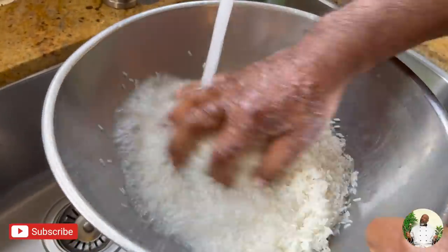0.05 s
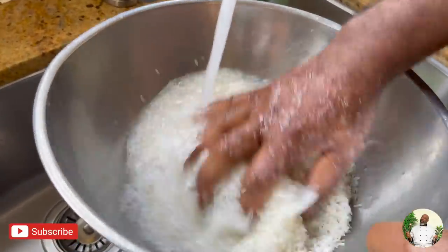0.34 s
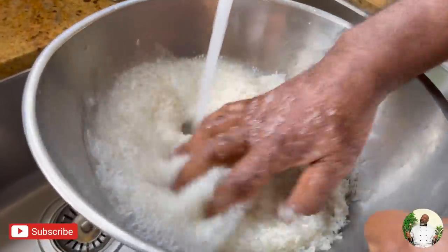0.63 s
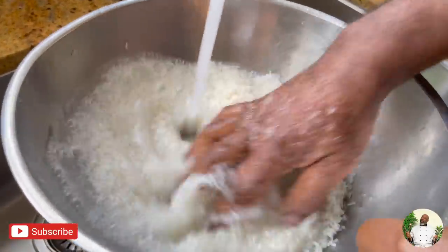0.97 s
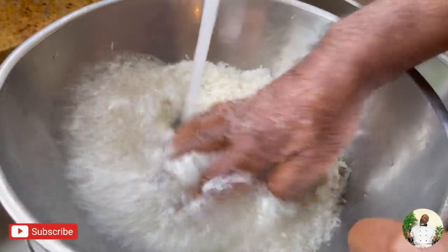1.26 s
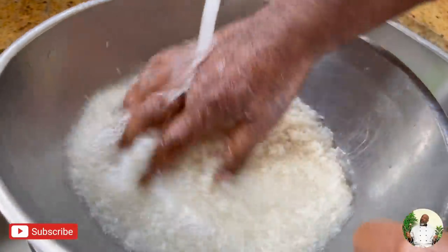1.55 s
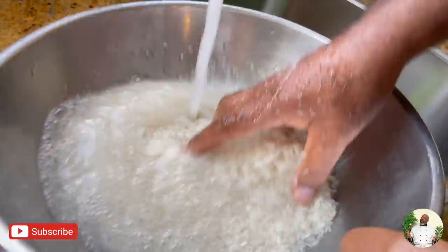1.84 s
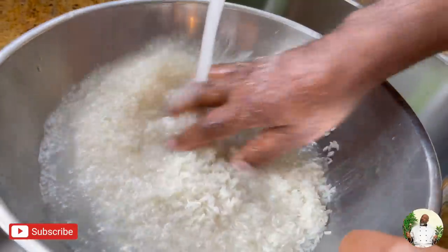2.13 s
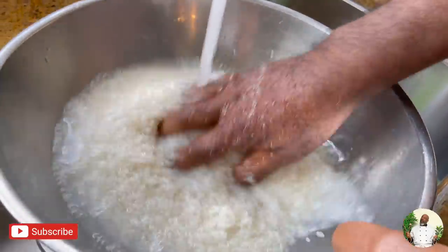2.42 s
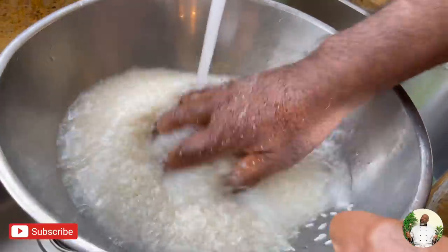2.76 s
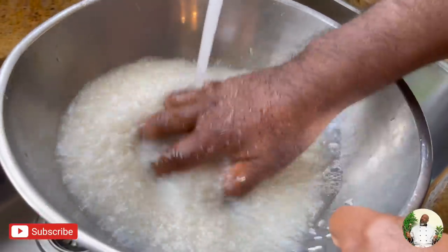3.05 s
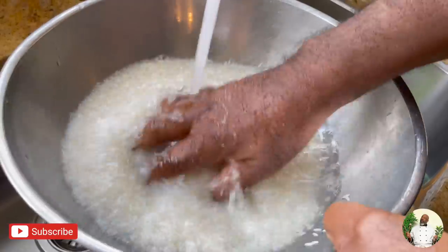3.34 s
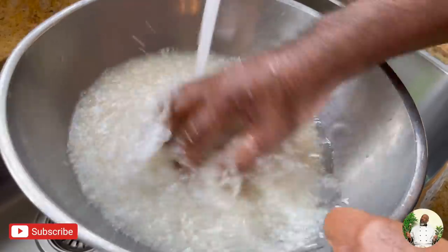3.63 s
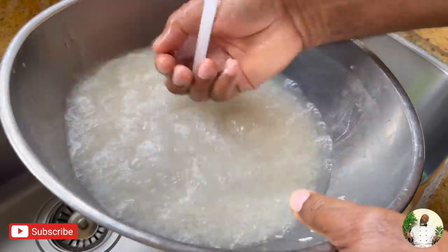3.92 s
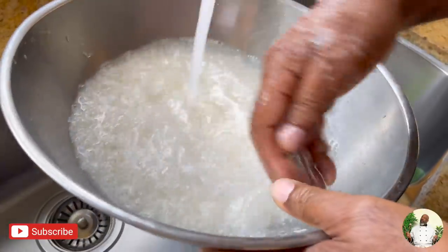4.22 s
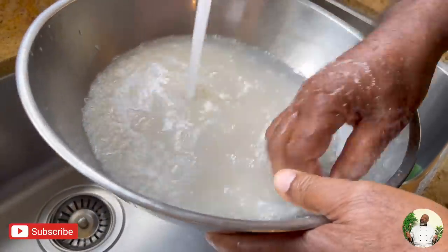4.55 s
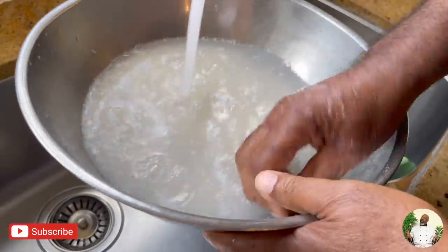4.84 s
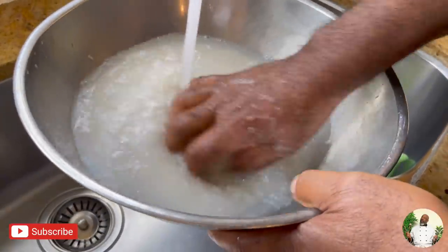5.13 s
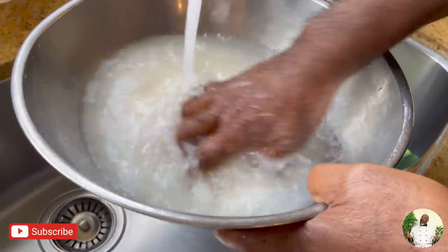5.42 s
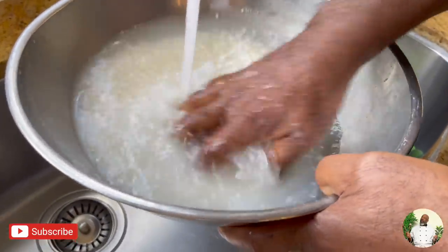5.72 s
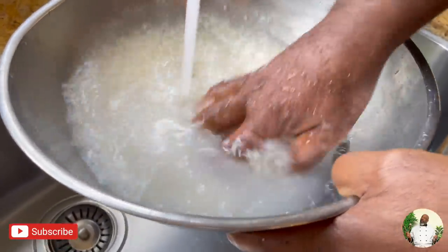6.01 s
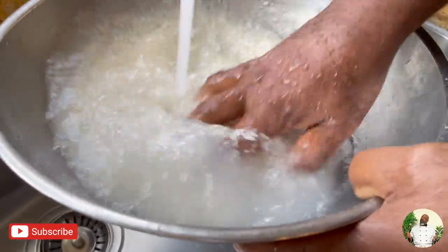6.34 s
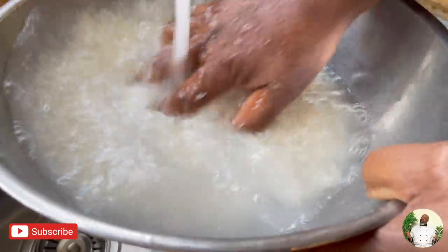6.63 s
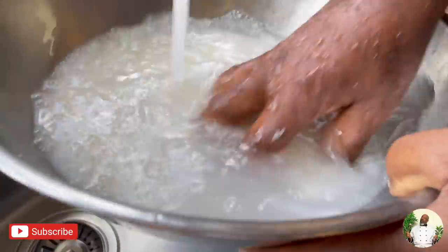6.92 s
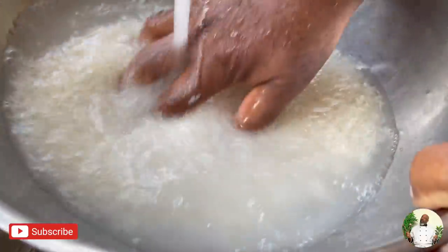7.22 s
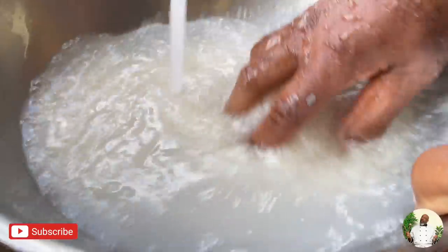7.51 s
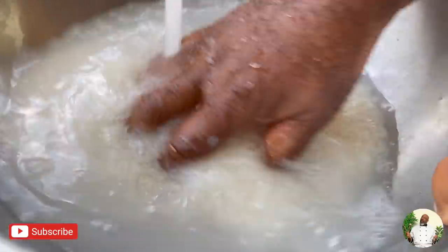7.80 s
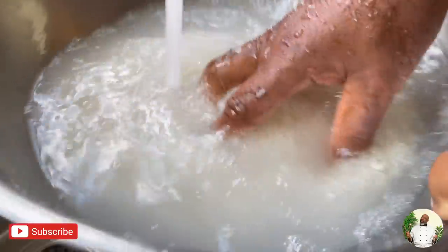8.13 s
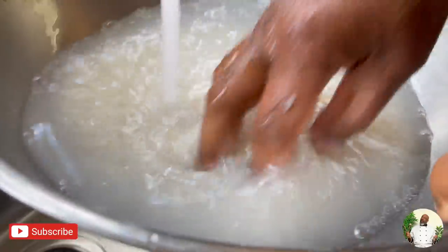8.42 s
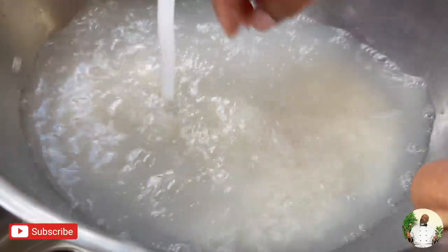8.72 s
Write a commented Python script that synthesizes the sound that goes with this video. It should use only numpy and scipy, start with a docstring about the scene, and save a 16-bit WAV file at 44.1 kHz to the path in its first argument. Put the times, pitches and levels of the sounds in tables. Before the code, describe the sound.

A tap runs into a steel bowl while a hand swishes rice in the water, with sloshes, plops and wet rustling.

```python
"""A fizzing tap jet and the wet rustle of rice, stirred and squeezed by hand in a steel bowl.
Aerator bubbles burst where the jet lands; grains tick and the steel rings with each stroke.
Air folded into the water plops, gulps and sloshes; water slaps and squirts between the fingers.
Midway, and briefly later, the hand cups the jet and the bowl quietens. Now and then the bowl rocks.
Kitchen walls reflect the water sounds; a motor hums underneath."""
import sys
import numpy as np
from scipy import signal
from scipy.fft import rfft, irfft
from scipy.io import wavfile
from scipy.ndimage import uniform_filter1d

SR = 44100
rng = np.random.default_rng(int(sys.argv[2]) if len(sys.argv) > 2 else 0)


def output_pcm(signal):
    """Save a mono or channel-first signal as 16-bit PCM at the path in sys.argv[1].

    Samples are clipped to [-1, 1] before scaling.
    """
    pcm = np.clip(np.atleast_2d(signal).T, -1, 1) * 32767
    wavfile.write(sys.argv[1], SR, np.round(pcm).astype(np.int16))


N = 386316
TIME_S, FREQ_HZ = np.arange(N) / SR, np.fft.rfftfreq(N, 1 / SR)

# Table levels are ahead of each source's trim.
# spectral shapes (frequency [Hz], gain [dB])
ROOM_SPECTRUM = [(20, -24), (32, -15), (45, -8), (60, 2), (80, -5), (120, -4), (230, -14.5), (430, -27.5),
                 (1000, -20), (4000, -19), (16000, -54)]
SHALLOW_SPECTRUM = [(30, -45), (60, -20), (95, -10), (130, 0.5), (160, 2), (190, 3), (235, -4), (290, 5),
                    (355, 2), (450, -8), (1200, -45)]
DEEP_SPECTRUM = [(30, -45), (60, -18), (95, -5), (125, -0.5), (178, 4), (228, -2), (265, 2), (320, -7.5),
                 (360, -5.5), (450, -15), (1200, -45)]
SPLASH_SPECTRUM = [(100, -36), (250, 7.5), (350, -5), (420, 1.5), (510, -2), (600, 3.5), (660, 0.5),
                   (720, 0.5), (810, -0.5), (900, 3), (990, -1.5), (1200, -0.5), (1450, 1), (1900, 1.5),
                   (4500, -17)]
RICE_SPECTRUM = [(400, -40), (900, -8), (1600, -10), (2100, -4.5), (2650, 2), (2950, 2), (3300, 1.5),
                 (3900, -1), (5000, -0.5), (8000, -45)]
FOAM_SPECTRUM = [(1500, -46), (2800, -28), (3700, -8), (4500, -3), (5050, -1), (5600, -1), (6500, -2.5),
                 (7500, -7.5), (10000, -27)]
JET_SPECTRUM = [(1500, -59), (4000, -27), (6000, -11), (7000, -8), (8000, -2), (9500, 2), (10600, 1.6),
                (11500, -1.5), (12300, -11), (13200, -14), (14100, -26), (16000, -39)]

# motor partials (frequency [Hz], level [dB])
MOTOR_PARTIALS = [(59.2, -57), (177.6, -65)]
# bowl rocks on its support (time [s], length [s], pitch [Hz], level [dB])
BOWL_NUDGES = [(1.627, 0.04, 130, -33.5), (1.646, 0.08, 57.8, -35), (3.19, 0.059, 109, -41),
               (4.827, 0.11, 49, -35)]
# bowl modes (frequency [Hz], width [Hz], level [dB], response to rubbing [dB/dB])
STEEL_MODES = [(276.6, 45, -55.5, .1), (679, 60, -62.5, .2), (860, 65, -57, 0.7), (2190, 280, -53, 0.79),
               (2974, 320, -51.5, 1.3), (5030, 570, -48.5, 0.98)]
# water swept round the bowl (time [s], length [s], resonance [Hz], level [dB])
WATER_SURGES = [(2.347, 0.14, 1010, -42), (2.768, 0.18, 875, -43), (2.857, .1, 430, -45),
                (3.01, 0.13, 1050, -42), (3.22, 0.27, 950, -47.5), (3.536, 0.12, 790, -42.5),
                (6.89, 0.14, 636, -43), (7.036, .09, 275, -41), (7.457, 0.13, 576, -41.5),
                (8.324, 0.4, 258, -44.5)]
# foam between hand and steel (time [s], length [s], resonance [Hz], level [dB])
FOAM_SIZZLES = [(0.062, 0.037, 4840, -32), (0.428, 0.034, 5070, -36), (.7, .06, 5100, -38),
                (.97, 0.13, 4970, -40), (2.735, 0.055, 5450, -39), (4.19, 0.047, 5050, -36),
                (5.292, 0.11, 5200, -41), (5.454, 0.069, 5040, -36), (5.752, 0.052, 5050, -40),
                (7.055, 0.04, 5030, -42), (7.62, 0.16, 4870, -35), (8.135, 0.073, 5000, -38)]
# fingers crunch through rice (time [s], length [s], level [dB])
RICE_SCRAPES = [(0.342, 0.13, -38), (0.947, 0.13, -36), (1.334, 0.045, -36), (2.197, 0.061, -36.5),
                (2.345, 0.11, -40), (2.538, 0.042, -31), (2.847, 0.053, -36), (5.758, 0.098, -39),
                (7.056, .08, -40)]
# water through fingers or palm (time [s], length [s], resonance [Hz], width [Hz], level [dB])
HAND_SQUIRTS = [(0.607, 0.066, 2050, 900, -36.5), (0.942, 0.032, 2500, 1100, -35),
                (1.268, 0.1, 2320, 800, -41), (1.92, 0.11, 2900, 550, -38), (1.982, 0.12, 1060, 550, -39.5),
                (2.055, 0.11, 1270, 600, -43.5), (3.224, 0.021, 1880, 2800, -35),
                (3.734, 0.024, 2300, 1200, -32.5), (3.839, 0.043, 4170, 2800, -34),
                (3.918, 0.057, 3020, 750, -31), (3.966, 0.043, 2950, 900, -38.5),
                (3.972, 0.082, 1980, 500, -42.5), (4.538, 0.033, 1820, 1200, -36),
                (5.288, 0.026, 2210, 890, -37), (6.16, 0.027, 1800, 1000, -36),
                (7.106, 0.017, 1100, 906, -35)]
# water and grains hit steel (time [s], level [dB], t60 [s])
STEEL_SPATTERS = [(2.057, -12, .02), (2.1989, -13, 0.057), (2.548, -15, 0.067), (3.088, -7, .012),
                  (3.235, -18, .03), (3.7407, -11, 0.1), (3.874, -16, .06), (4.1162, -8, 0.011),
                  (4.197, -10, 0.011), (4.267, -20, .03)]
# hollows fill or open (time [s], length [s], first pitch [Hz], last pitch [Hz], level [dB])
HOLLOW_GLUGS = [(2.004, .016, 480, 228, -32), (3.522, 0.02, 420, 230, -29.5), (4.631, 0.047, 526, 850, -32),
                (5.945, 0.015, 1280, 1620, -35), (5.995, 0.012, 510, 240, -33),
                (6.393, .02, 2200, 1400, -33), (6.556, 0.024, 600, 904, -22), (7.538, 0.025, 560, 850, -39),
                (7.584, .018, 560, 800, -32), (8.106, 0.017, 724, 303, -29.5)]
# air pockets behind the fingers (time [s], pitch at peak [Hz], level [dB])
POCKET_GULPS = [(.079, 225, -29), (0.295, 190, -30.5), (.397, 222, -28.5), (0.515, 165, -32.5),
                (.675, 272, -27), (.772, 129, -29), (2.007, 257, -27), (2.322, 220, -28),
                (3.246, 195, -27.5), (3.3, 210, -30), (3.528, 204, -26), (4.201, 180, -26),
                (4.267, 175, -29), (4.327, 188, -30), (4.342, 200, -32), (5.302, 174, -29),
                (5.453, 167, -34), (5.676, 179, -32), (5.751, 160, -30), (6, 210, -26), (6.074, 171, -23),
                (6.089, 183, -27), (6.435, 175, -27), (6.459, 164, -25), (6.825, 180, -20.5),
                (6.868, 173, -25), (6.934, 172, -28), (6.962, 180, -29), (7.073, 230, -34),
                (7.115, 230, -30), (7.507, 157, -24), (7.62, 175, -27), (7.654, 180, -27.5),
                (8.049, 158, -26), (8.118, 176, -24), (8.204, 187, -27.5), (8.392, 240, -31),
                (8.519, 236, -30), (8.743, 245, -27.5)]
# water hits the fingers (time [s], resonance [Hz], width [Hz], level [dB])
FINGER_SLAPS = [(.297, 836, 700, -28.5), (1.477, 850, 700, -27), (1.643, 637, 500, -31),
                (1.914, 1400, 900, -23), (2.323, 930, 700, -21), (2.478, 1000, 600, -20.5),
                (2.643, 825, 600, -21.5), (2.842, 800, 600, -27), (3.2355, 1140, 1800, -12),
                (3.367, 1200, 700, -19.5), (3.519, 2200, 2200, -13.5), (3.647, 1100, 1200, -25),
                (3.747, 2320, 2200, -25), (4.273, 1560, 1200, -21.5), (4.847, 1840, 900, -19.5),
                (4.982, 600, 500, -27), (5.166, 2500, 1500, -18.5), (5.556, 1900, 800, -18.5),
                (5.73, 1150, 900, -26), (6.19, 450, 400, -28.5), (6.409, 550, 600, -23.5),
                (6.578, 1460, 800, -23), (6.819, 1680, 700, -21), (6.852, 900, 890, -25),
                (7.856, 1340, 900, -22), (8.095, 480, 400, -31), (8.221, 1770, 700, -27),
                (8.223, 1000, 800, -23)]
# loudest bubbles (time [s], pitch [Hz], level [dB], t60 [s])
LOUD_BUBBLES = [(.028, 1660, -22, .026), (.34, 1534, -21.5, 0.057), (.395, 1740, -20.5, .025),
                (.574, 2290, -23, 0.021), (.774, 1397, -22, 0.033), (1.054, 960, -26.5, 0.039),
                (1.135, 1650, -25.5, .02), (1.21, 840, -26.5, 0.072), (1.275, 2400, -16, 0.027),
                (1.31, 2140, -18, 0.036), (1.313, 880, -22, 0.036), (1.376, 1950, -18, .029),
                (1.3818, 7600, -7, .004), (1.911, 814, -17, .016), (1.925, 3040, -15, .02),
                (1.974, 900, -19, .025), (2.001, 900, -13.5, 0.024), (2.077, 1130, -15, .022),
                (2.476, 956, -21, .026), (2.837, 700, -17.5, 0.04), (3.052, 1160, -15, 0.019),
                (3.078, 900, -26, 0.028), (3.346, 1120, -24, .018), (3.366, 1150, -22, 0.024),
                (3.431, 1100, -26, .018), (3.553, 615, -22, .026), (4.358, 1820, -23, 0.034),
                (4.374, 910, -25, .034), (4.503, 595, -25.5, 0.036), (4.806, 667, -19, 0.024),
                (5.015, 715, -21.5, 0.037), (5.021, 1760, -27, .025), (5.104, 710, -20, 0.026),
                (5.12, 642, -21.5, 0.072), (5.141, 940, -19, .025), (5.151, 1383, -17, 0.065),
                (5.164, 2660, -27, .022), (5.5558, 1890, -21, 0.019), (5.556, 2260, -24, .014),
                (5.5562, 1400, -21.5, .016), (5.598, 1990, -26, .07), (5.651, 2950, -21, .03),
                (5.654, 1890, -20, 0.031), (5.807, 692, -14.5, .025), (5.895, 927, -20.5, 0.034),
                (6.15, 824, -27, 0.063), (6.165, 1350, -23, 0.034), (6.167, 1830, -23, .02),
                (6.183, 1660, -22, .02), (6.422, 790, -20, .024), (6.49, 820, -21, .024),
                (6.519, 1850, -20.5, 0.023), (6.54, 1920, -20, 0.02), (6.857, 570, -16, 0.028),
                (6.894, 477, -16.5, 0.044), (7.078, 1540, -24, 0.038), (7.086, 730, -19.5, 0.035),
                (7.11, 904, -22, 0.047), (7.347, 1846, -21, 0.054), (7.706, 610, -25, .028),
                (7.813, 730, -28, 0.032), (7.854, 1665, -19, 0.016), (7.992, 1640, -23, 0.035),
                (8.094, 853, -19.5, 0.036), (8.094, 1460, -17.5, 0.033), (8.225, 435, -27.5, .045),
                (8.397, 652, -23, 0.069), (8.441, 2060, -26, .025), (8.444, 2650, -21, .026),
                (8.582, 575, -23.5, 0.048), (8.617, 620, -29, 0.038), (8.653, 740, -20, 0.027),
                (8.663, 1180, -25, .028), (8.683, 595, -26, 0.04)]

# hand strokes (time [s], length [s], jet churn [dB], rice rub [dB], plunge [dB])
HAND_STROKES = [(0.002, 0.05, 2, 5, 5.5), (0.265, 0.15, 2, 3, 5), (0.412, 0.097, 2, 3.5, -1),
                (0.615, .2, 1.5, 5, 2), (0.908, 0.24, 2.5, 3, 5.5), (1.24, 0.15, 2.5, 3.5, 2),
                (1.471, 0.057, 3.5, 2.5, 9), (1.596, 0.079, 0.5, 2.5, 7), (1.787, 0.081, 2.5, 4.5, 0),
                (1.903, 0.079, 3, 7.5, 7), (2.004, 0.047, 5.5, 4, 0), (2.184, 0.079, 3, 6.5, -3),
                (2.283, 0.15, 2.5, 4, 2.5), (2.512, 0.15, 3.5, 5, 4), (2.73, 0.045, 2.5, 5.5, 2),
                (2.824, 0.18, 3, 4, 5.5), (3.065, 0.034, 4, 3.5, 2), (3.179, 0.056, 2.5, 7, -1),
                (3.268, 0.16, 1.5, 2.5, 2), (3.48, 0.17, 2.5, 3, 5.5), (4.19, 0.21, -0.5, -1.5, 4.5),
                (4.496, 0.035, 0.5, -0.5, 8), (4.564, 0.22, 0, -1, 4), (4.79, 0.13, 0, -1.5, 4),
                (4.94, 0.2, 0, -2.5, 7), (5.286, 0.24, 2, -1, 4.5), (5.64, 0.19, 2, 1, 4.5),
                (5.976, 0.21, 2, 1.5, 6.5), (6.373, 0.13, 2, 1, 7), (6.717, 0.31, 0.5, 0.5, 7.5),
                (7.047, 0.046, 2.5, 0, 12.5), (7.323, 0.29, 0, 1, 5.5), (7.58, 0.2, 0.7, 0, 4),
                (7.843, 0.034, 0.5, -0.5, 3), (7.978, 0.27, 1, 0.5, 6), (8.314, 0.23, 1.5, 0, 4),
                (8.514, 0.2, 1.5, -3, 1.5)]
# hand cups the jet (time [s], length [s], share caught [0-1])
JET_CATCHES = [(3.66, 0.34, 0.21), (3.981, .15, 0.35), (5.22, 0.036, 0.16), (6.575, 0.05, 0.16),
               (7.208, 0.08, 0.21), (7.9, 0.048, 0.2)]
# base level of jet and foam (time [s], level [dB])
TAP_LEVEL = [(0, -32), (2.3, -32), (3.3, -33), (4.3, -31.5), (5.7, -34), (6.4, -32), (7.7, -29.5),
             (8.76, -32.5)]
# levels between strokes (start [dB], slope as the bowl fills [dB/s], change at full catch [dB])
RICE_BASE = (-40, -0.054, -17)
SPLASH_BASE = (-47.5, 0.68, -26)
SLOSH_BASE = (-48.5, -0.13, -24)

# stereo width (frequency [Hz], side gain [ratio])
MIC_WIDTH = [(60, .25), (200, .28), (450, .7), (1500, 1), (5500, .85), (7000, .6), (8500, .35), (12000, .3)]
# stereo balance (frequency [Hz], left minus right [dB])
MIC_BALANCE = [(60, 1), (150, 1.5), (450, 0), (780, 7), (1100, 2.5), (3000, 4), (4000, 2.5), (5200, 6.5),
               (6200, 2), (7300, 4.3), (7700, 0), (16000, 0)]
# stereo phase (frequency [Hz], left lead [rad])
MIC_LEAD = [(0, 0), (400, .1), (600, .9), (1000, .1), (1800, 0), (3000, 1.1), (4200, .4), (5000, .75),
            (6500, 0), (8600, 0), (9900, -2.9), (10350, -3.14), (11800, -6.28), (12600, -6.28),
            (13200, -9.42), (14300, -9.42), (14700, -12.57)]


def gain_of(db):
    """Decibels to amplitude."""
    return 10 ** (np.asarray(db) / 20)


def unit_rms(x):
    """Scale to rms 1."""
    return x / np.sqrt(np.mean(x ** 2) + 1e-20)


def curve(points):
    """Interpolate a table over log frequency."""
    hz, value = np.transpose(points)
    return np.interp(np.log(FREQ_HZ + 1), np.log(hz + 1), value)


def coloured(x, spectrum):
    """Filter by a spectrum; rms 1."""
    return unit_rms(irfft(rfft(x) * gain_of(curve(spectrum)), N))


def drift(rate_hz):
    """Low-passed random wander; rms 1."""
    return unit_rms(irfft(rfft(rng.standard_normal(N)) * np.exp(-(FREQ_HZ / rate_hz) ** 2), N))


def noise(side=0.18):
    """Stereo white noise, mostly common to both ears."""
    common, difference = rng.standard_normal((2, N))
    return unit_rms(np.array([common + side * difference, common - side * difference]))


def add(mix, start_s, sound):
    """Mix a sound in place."""
    part = mix[..., max(round(start_s * SR), 0):][..., :sound.shape[-1]]
    part += sound[..., :part.shape[-1]]


def resonant(x, hz, width_hz):
    """One resonance, applied twice for steep skirts."""
    b, a = signal.iirpeak(hz, hz / width_hz, fs=SR)
    return signal.lfilter(b, a, signal.lfilter(b, a, x))


def bubble_ring(age, rise, onset):
    """Envelope and phase [pitch x t60] against age [t60]; a bubble nearing the surface climbs."""
    envelope = np.exp(-6.9 * age) * (1 - np.exp(-age / onset))
    return envelope, age + rise * age * age / 2


def swarm(per_s, low_hz, high_hz, cycles, spread_db, rise, scatter_turns=0.16):
    """Small bubbles or grain impacts, random in time, pitch, size and direction; rms 1."""
    when, pitch, size, life, place = rng.random((int(per_s * N / SR), 5), dtype=np.float32).T[:, :, None]
    hz = low_hz + (high_hz - low_hz) * pitch ** 1.5
    t60_turns = cycles * (.5 + life)
    n = np.arange(int(cycles / (low_hz + high_hz) * 2 * SR))
    envelope, phase = bubble_ring(n.astype(np.float32) * (hz / t60_turns / SR), rise, onset=0.05)
    size_db = spread_db * np.minimum(-np.log(1 - size), 4)
    envelope = envelope * gain_of(size_db) * np.sqrt(hz)
    indices = ((when * N).astype(int) + n).ravel()
    lead_turns = scatter_turns * (2 * place - 1)
    ears = []
    for side in (-1, 1):
        rings = envelope * np.sin(2 * np.pi * (t60_turns * phase + side * lead_turns))
        ears.append(np.bincount(indices, rings.ravel(), N)[:N])
    return unit_rms(np.array(ears))


def at_level(x, level_db, window_samples=6000):
    """Flatten a texture's running power, then impose a level."""
    power = uniform_filter1d((x ** 2).mean(0), window_samples)
    power = uniform_filter1d(power, window_samples // 2)
    return x / np.sqrt(abs(power) + 1e-9) * gain_of(level_db)


def swells(texture, rows, trim_db=0):
    """Short tapered bursts of a texture, each through one resonance."""
    out = np.zeros((2, N))
    for start_s, length_s, hz, width_hz, db in rows:
        burst = resonant(texture[:, int(start_s * SR):][:, :int(length_s * SR)], hz, width_hz)
        taper = signal.windows.tukey(burst.shape[1], .6)
        add(out, start_s, gain_of(db + trim_db) * unit_rms(burst * taper))
    return out


def gesture(start_s, length_s, attack_s, release_s):
    """Trapezoid of one hand movement, 0-1."""
    end_s = start_s + max(length_s, attack_s)
    return np.interp(TIME_S, [start_s, start_s + attack_s, end_s, end_s + release_s], [0, 1, 1, 0])


def bowl_level(start_db, fill_db_per_s, cupped_db, cupped):
    """Level [dB] between strokes: shifts as the bowl fills, dips while the palm catches the jet."""
    return start_db + fill_db_per_s * TIME_S + cupped_db * cupped


def kitchen(rumble_db=-45.5, waver_rad=0.21):
    """Wavering motor hum over room rumble."""
    hum = sum(gain_of(db) * np.sqrt(2) * np.sin(2 * np.pi * hz * TIME_S + waver_rad * drift(7.4))
              for hz, db in MOTOR_PARTIALS)
    return hum + gain_of(rumble_db) * coloured(noise(), ROOM_SPECTRUM)


def echoes(x, t60_s, wet_db, patterns=7, crossfade_s=.12, predelay_s=.002):
    """Dense wall reflections; the pattern shifts as arm and bowl move."""
    out, t = np.zeros((2, N)), np.arange(int(t60_s * SR)) / SR
    for k in range(patterns):
        taps = rng.standard_normal((2, len(t))) * gain_of(-60 * t / t60_s) * (t > predelay_s)
        distance = abs((TIME_S / crossfade_s - k) % patterns - patterns / 2)
        fade = np.sqrt(np.maximum(1 - distance, 0))
        out += signal.oaconvolve(x * fade, taps / np.linalg.norm(taps[0]), axes=1)[:, :N]
    return gain_of(wet_db) * out


def nudges():
    """The heavy bowl rocks in soft, low wobbles."""
    out = np.zeros(N)
    for start_s, length_s, hz, db in BOWL_NUDGES:
        t = np.arange(int(length_s * SR)) / SR
        add(out, start_s, gain_of(db) * np.sin(np.pi * t / length_s) * np.sin(2 * np.pi * hz * t))
    return out


def steel_ring(rub_db, hits_per_s=900):
    """Drops and grains excite the bowl's modes; the high ones follow the rubbing most."""
    hits = rng.standard_normal(N) * (rng.random(N) < hits_per_s / SR)
    patter = unit_rms(hits) + 1.17 * noise()
    return sum(gain_of(db + response * rub_db) * unit_rms(resonant(patter, hz, width_hz))
               for hz, width_hz, db, response in STEEL_MODES)


def surges(width_ratio=0.5):
    """Overlapping air pockets boom in the bowl's hollow as the water is swept round."""
    pockets = swarm(per_s=340, low_hz=198, high_hz=1317, cycles=40, spread_db=3.5, rise=0.22)
    rows = [(start_s, length_s, hz, hz * width_ratio, db) for start_s, length_s, hz, db in WATER_SURGES]
    return swells(pockets + noise(), rows, trim_db=-1)


def sizzles(width_hz=750):
    """Foam bubbles of nearly one size ring together between hand and steel."""
    foam = swarm(per_s=990, low_hz=4230, high_hz=6110, cycles=60, spread_db=2.0, rise=0.055)
    rows = [(start_s, length_s, hz, width_hz, db) for start_s, length_s, hz, db in FOAM_SIZZLES]
    return swells(foam + .6 * noise(), rows, trim_db=-1)


def scrapes(hz=2900, width_hz=2200):
    """Squeezed grains slip past each other in sharp ticks."""
    ticks = swarm(per_s=760, low_hz=1860, high_hz=5700, cycles=9.3, spread_db=4.0, rise=0)
    rows = [(start_s, length_s, hz, width_hz, db) for start_s, length_s, db in RICE_SCRAPES]
    return swells(ticks + 0.74 * noise(), rows, trim_db=-1)


def squirts():
    """Water and air gurgle through a broad resonance in the hollow of the hand."""
    rush = noise()
    bubbles = swarm(per_s=1400, low_hz=886, high_hz=3980, cycles=9.3, spread_db=9.0, rise=0.11)
    return swells(rush + 0.26 * bubbles, HAND_SQUIRTS)


def spatters(trim_db=-8):
    """Flung water and grains hit the steel in short bright bursts."""
    envelope, t = np.zeros(N), np.arange(SR // 10) / SR
    for start_s, db, t60_s in STEEL_SPATTERS:
        add(envelope, start_s, gain_of(db + trim_db - 60 * t / t60_s))
    return envelope * unit_rms(coloured(noise(), JET_SPECTRUM) + 0.2 * coloured(noise(), RICE_SPECTRUM))


def glugs(flutter=0.32):
    """A hollow's pitch climbs as it fills, falls as it opens; the inflow makes it flutter."""
    out = np.zeros(N)
    for start_s, length_s, first_hz, last_hz, db in HOLLOW_GLUGS:
        progress = np.linspace(0, 1, int(length_s * SR))
        turns = np.cumsum(first_hz * (last_hz / first_hz) ** progress) / SR
        add(out, start_s, gain_of(db) * np.sin(np.pi * progress ** 0.77) * np.sin(2 * np.pi * turns))
    return out * (1 + flutter * drift(330))


def gulps(trim_db=-1, swell_s=0.0063, fall_s=0.003):
    """A cavity opens behind a finger; its pitch drops fast as it grows."""
    out, t = np.zeros(N), np.arange(SR // 16) / SR
    envelope = (t / swell_s * np.exp(1 - t / swell_s)) ** 3
    glide = 1 + 1.43 * (np.exp(-t / fall_s) - np.exp(-swell_s / fall_s))
    for start_s, hz, db in POCKET_GULPS:
        turns = np.cumsum(hz * glide) / SR
        add(out, start_s, gain_of(db + trim_db) * envelope * np.sin(2 * np.pi * turns))
    return out


def slaps(breakup=0.053, breakup_s=0.01):
    """A smack and a spray of droplets excite a heavily damped air pocket."""
    out, t = np.zeros((2, N)), np.arange(SR // 16) / SR
    smack, spray = signal.unit_impulse(len(t)), noise()
    for start_s, hz, width_hz, db in FINGER_SLAPS:
        cavity = resonant(smack, hz, width_hz)
        drive = smack + breakup * np.exp(-t / breakup_s) * spray[:, int(start_s * SR):][:, :len(t)]
        add(out, start_s, gain_of(db) * signal.fftconvolve(drive, cavity[None] / abs(cavity).max()))
    return out


def faint_bubbles(per_s=6, tries=4, level_db=-37, spread_db=1, t60_s=0.018,
                  first_low_hz=1390, high_hz=2970, octaves_per_s=-0.204):
    """Random bubbles folded in by the strokes; rows as in LOUD_BUBBLES."""
    rows = []
    for start_s, length_s, *_ in HAND_STROKES:
        low_hz = first_low_hz * 2 ** (octaves_per_s * start_s)  # falls as the water deepens
        for when, pitch, size, chance in rng.random((tries, 4)):
            if chance < per_s * length_s / tries:
                hz = low_hz * (high_hz / low_hz) ** pitch
                db = level_db + spread_db * (2 * size - 1)
                rows.append((start_s + when * length_s, hz, db, t60_s * (.5 + size)))
    return rows


def plops(trim_db=2.0, rise=0.35, scatter_rad=0.75, children=3, child_db=-14.0, child_delay_s=.012):
    """Each bubble rings with a climbing pitch and sheds fainter ones as it breaks."""
    out = np.zeros((2, N))
    jostle = 1 + 0.4 * drift(650)  # grains roughen the ring
    for start_s, hz, db, t60_s in list(LOUD_BUBBLES) + faint_bubbles():
        age = np.arange(int(t60_s * SR)) / (t60_s * SR)
        envelope, phase = bubble_ring(age, rise, onset=0.07)
        first_hz = hz / (1 + rise / 7)  # passes hz near the peak
        for k, (offset, place, detune, delay) in enumerate(rng.uniform(-1, 1, (1 + children, 4))):
            is_child = k > 0
            turns = first_hz * t60_s * phase * np.exp(is_child * 0.49 * detune)
            ears_rad = np.pi * offset + scatter_rad * place * np.array([[1], [-1]])
            ring = envelope * np.sin(2 * np.pi * turns + ears_rad)
            onset_s = start_s + is_child * child_delay_s * abs(delay)
            add(out, onset_s, gain_of(db + trim_db + is_child * child_db) * ring)
    return out * jostle


def slosh(level_db, trim_db=0.7, deep_at_s=4.6):
    """Damped cavities push on the bowl's floor; the boom sinks as the water deepens."""
    pockets = swarm(per_s=200, low_hz=106.2, high_hz=452.6, cycles=17.0, spread_db=-0.5, rise=-0.077)
    churn = pockets + noise()
    depth = np.minimum(TIME_S / deep_at_s, 1)
    boom = (1 - depth) * coloured(churn, SHALLOW_SPECTRUM) + depth * coloured(churn, DEEP_SPECTRUM)
    return at_level(boom, level_db + trim_db, window_samples=3000)


def splash(level_db, trim_db=1.63, clump_db=0.8):
    """Mid-sized bubbles folded in by the hand, in a wash of churned water."""
    bubbles = swarm(per_s=520, low_hz=323, high_hz=2430, cycles=22.6, spread_db=3.0, rise=0.24)
    wash = coloured(bubbles + 1.94 * noise(), SPLASH_SPECTRUM)
    return at_level(wash * gain_of(clump_db * drift(24)), level_db + trim_db, window_samples=3600)


def rice(level_db, clump_db=1.0):
    """Wet grains tick on each other and the steel, in clumps as the fingers push."""
    ticks = swarm(per_s=1500, low_hz=1520, high_hz=5104, cycles=62, spread_db=2.5, rise=0.044)
    rustle = coloured(ticks + 1.8 * noise(), RICE_SPECTRUM)
    return at_level(rustle * gain_of(clump_db * drift(44)), level_db)


def foam_hiss(level_db):
    """Foam hisses in the hollow of the bowl."""
    foam = swarm(per_s=1500, low_hz=3610, high_hz=7810, cycles=40, spread_db=4.5, rise=0.21)
    return at_level(coloured(foam + 2.94 * noise(), FOAM_SPECTRUM), level_db)


def jet(level_db, trim_db=0.23):
    """Tiny aerator bubbles burst where the jet lands, over a fine hiss."""
    fizz = swarm(per_s=4000, low_hz=5960, high_hz=14310, cycles=42, spread_db=4.5, rise=0.075)
    return at_level(coloured(fizz + 2.6 * noise(), JET_SPECTRUM), level_db + trim_db)


def stirring():
    """Strokes drive six continuous layers; uneven fingers jolt all but the steel together."""
    churn_db, rub_db, plunge_db = sum(
        np.outer(boosts_db, gesture(start_s, length_s, attack_s=0.023, release_s=0.054))
        for start_s, length_s, *boosts_db in HAND_STROKES)
    cupped = sum(share * gesture(start_s, length_s, attack_s=0.031, release_s=0.049)
                 for start_s, length_s, share in JET_CATCHES)
    tap_db = np.interp(TIME_S, *np.transpose(TAP_LEVEL))
    foam_db = tap_db + bowl_level(start_db=-5.5, fill_db_per_s=0.11, cupped_db=-19.5, cupped=cupped)
    wander = drift(33)
    jolt_db = unit_rms(wander - uniform_filter1d(wander, size=8000))  # quick jerks only
    return (jet(tap_db + 3 + churn_db - 3.5 * cupped + 0.9 * jolt_db)
            + foam_hiss(foam_db + 1.24 * churn_db + jolt_db)
            + steel_ring(rub_db - 7 * cupped)
            + rice(bowl_level(*RICE_BASE, cupped) + 0.83 * rub_db + 0.8 * jolt_db)
            + splash(bowl_level(*SPLASH_BASE, cupped) + 0.82 * rub_db + 0.3 * plunge_db + 2 * jolt_db)
            + slosh(bowl_level(*SLOSH_BASE, cupped) + plunge_db + 0.5 * jolt_db))


def scene():
    """Water and rice with wall reflections, over bowl wobble and room tone."""
    background = nudges() + kitchen()
    bowl = (stirring() + gulps() + spatters() + squirts() + plops()
            + glugs() + slaps() + surges() + scrapes() + sizzles())
    return bowl + echoes(bowl, t60_s=.22, wet_db=-6.5) + background


def record(dry):
    """Close microphone pair: width, balance and phase per frequency, then a low-pass."""
    left, right = rfft(dry)
    mid = (left + right) / 2
    side = (left - right) / 2 * curve(MIC_WIDTH)
    tilt = gain_of(curve(MIC_BALANCE) / 2)
    right_lag = np.exp(-1j * curve(MIC_LEAD))
    mics = np.array([(mid + side) * tilt, (mid - side) / tilt * right_lag])
    lowpass = signal.firwin(511, cutoff=15800, window=("kaiser", 9), fs=SR)
    return signal.oaconvolve(irfft(mics, N), lowpass[None], "same")


dry = scene()
out = record(dry)
output_pcm(out)
```